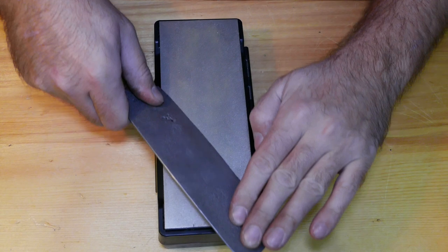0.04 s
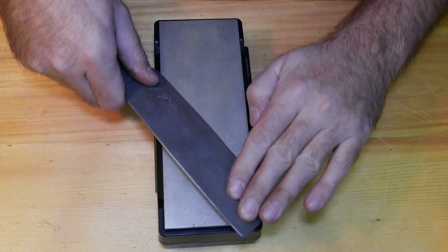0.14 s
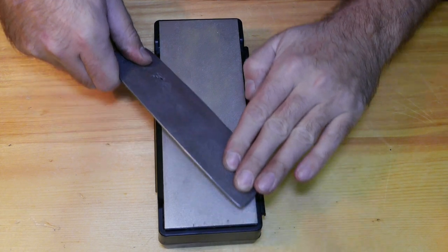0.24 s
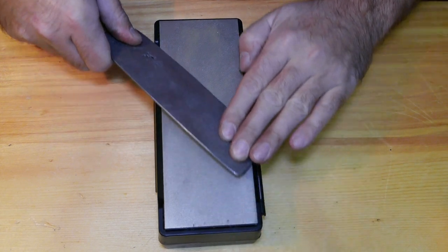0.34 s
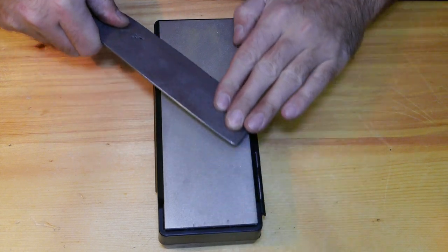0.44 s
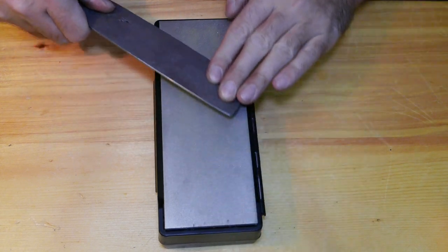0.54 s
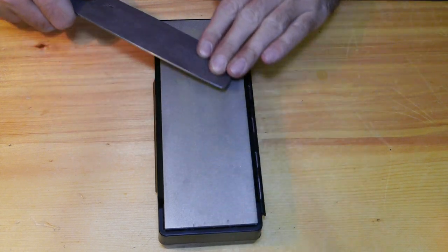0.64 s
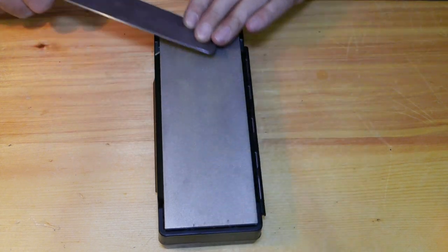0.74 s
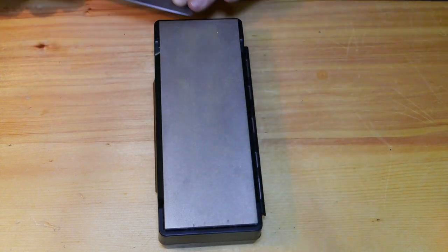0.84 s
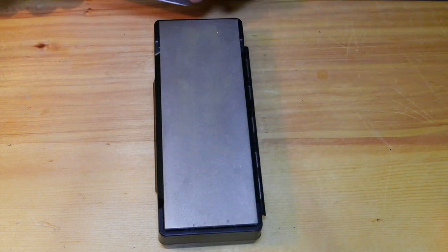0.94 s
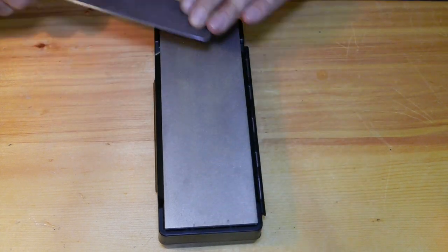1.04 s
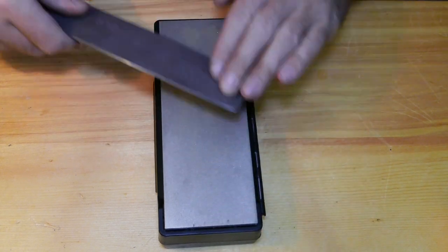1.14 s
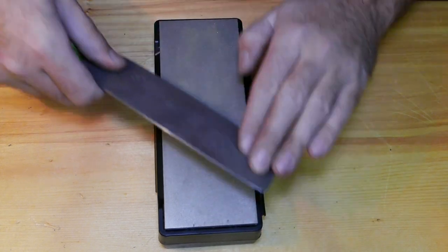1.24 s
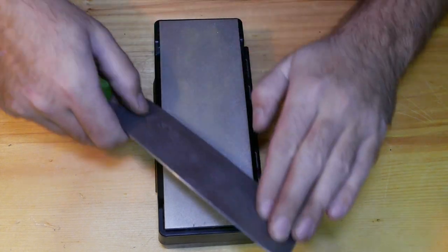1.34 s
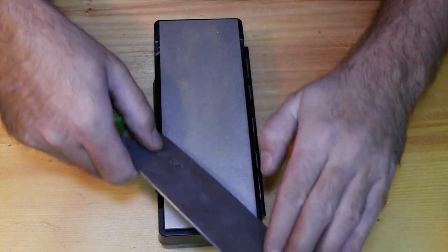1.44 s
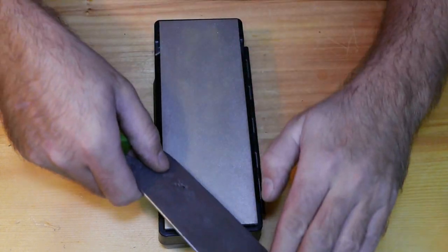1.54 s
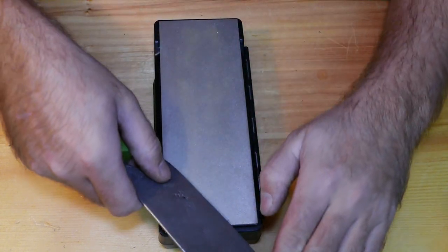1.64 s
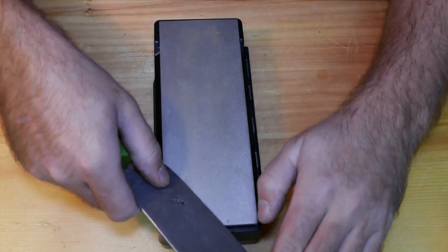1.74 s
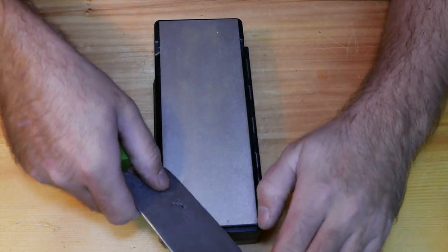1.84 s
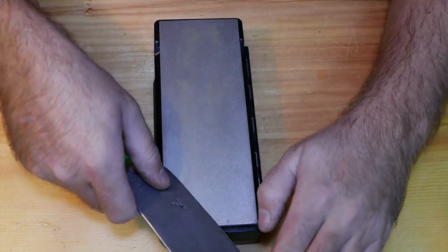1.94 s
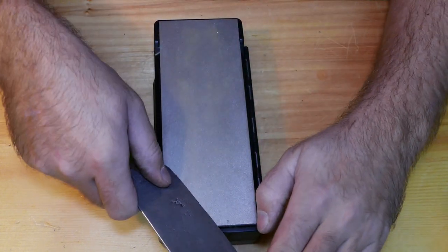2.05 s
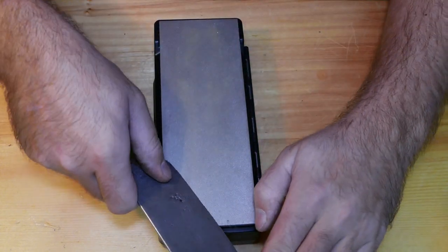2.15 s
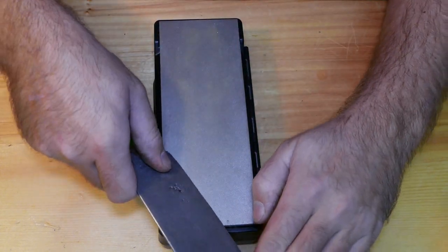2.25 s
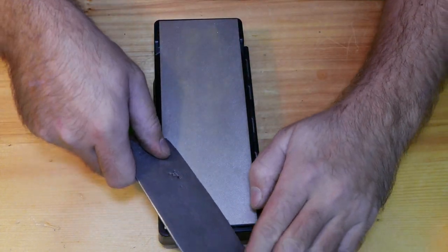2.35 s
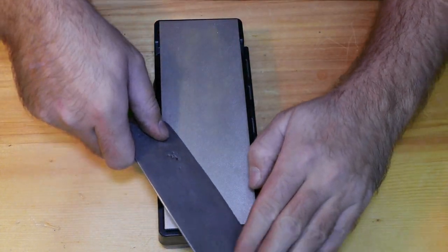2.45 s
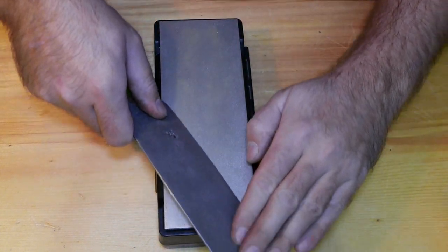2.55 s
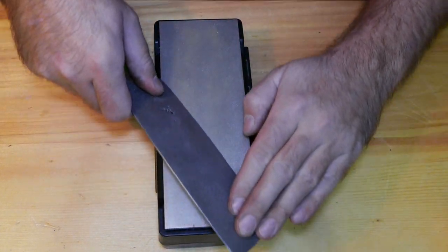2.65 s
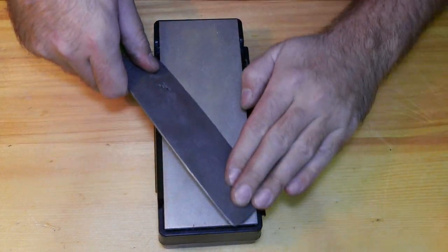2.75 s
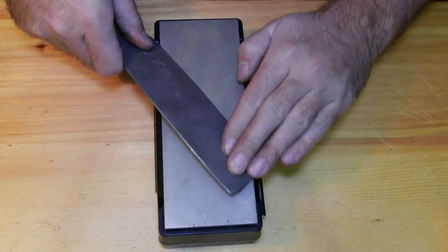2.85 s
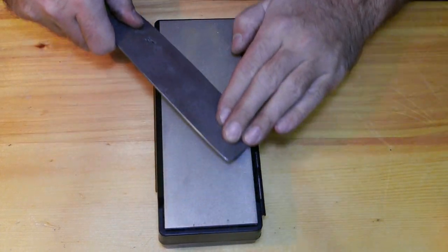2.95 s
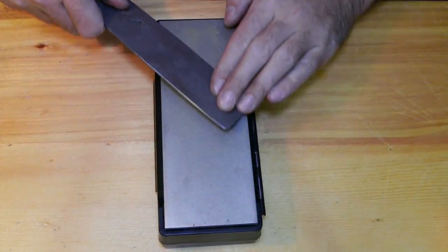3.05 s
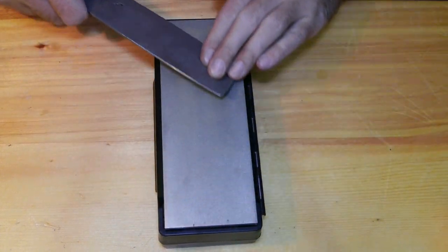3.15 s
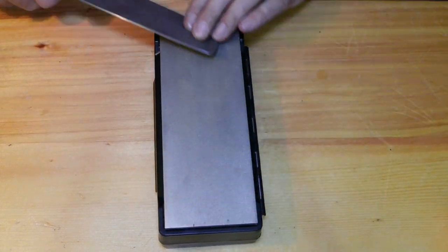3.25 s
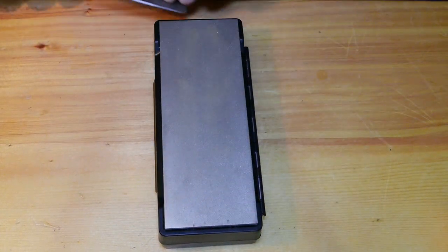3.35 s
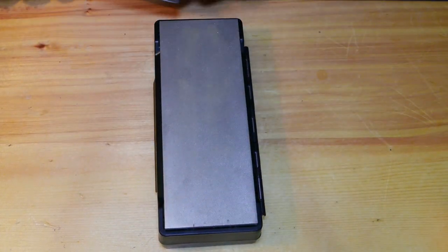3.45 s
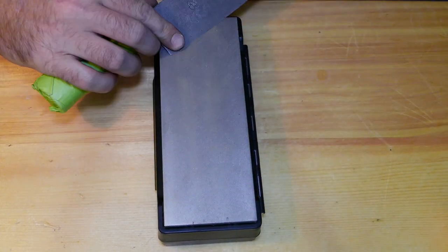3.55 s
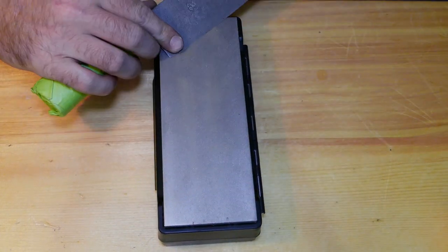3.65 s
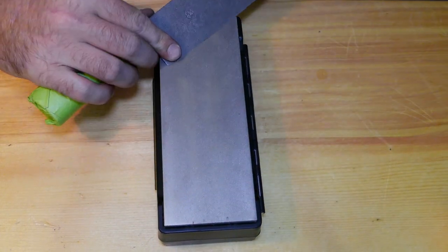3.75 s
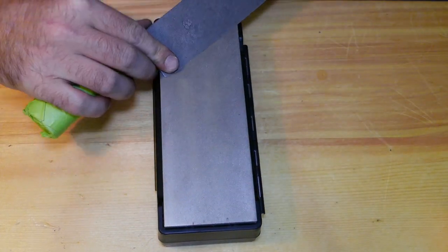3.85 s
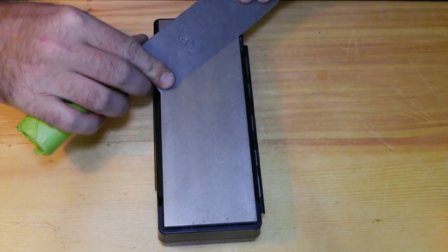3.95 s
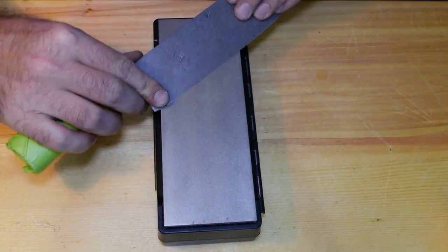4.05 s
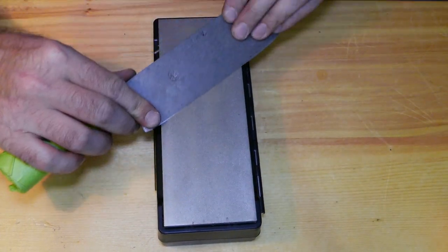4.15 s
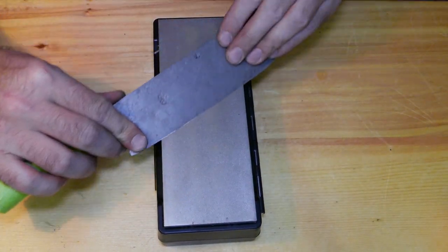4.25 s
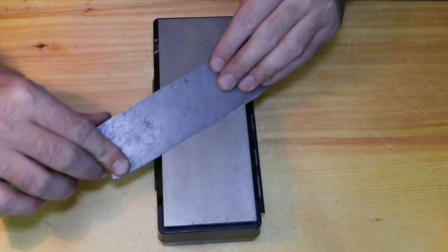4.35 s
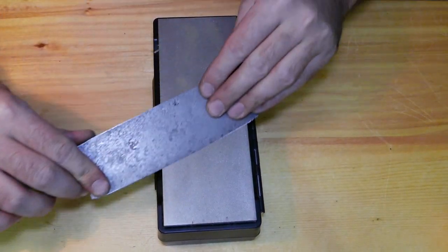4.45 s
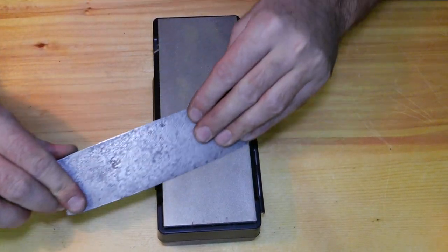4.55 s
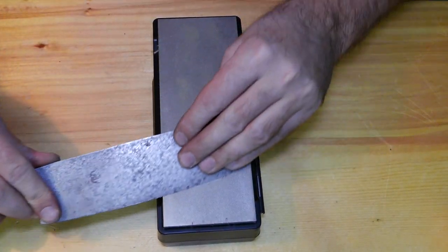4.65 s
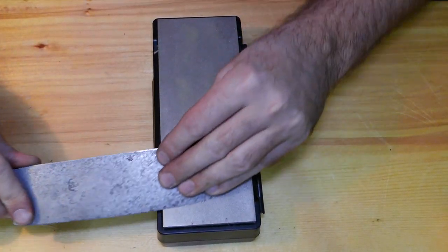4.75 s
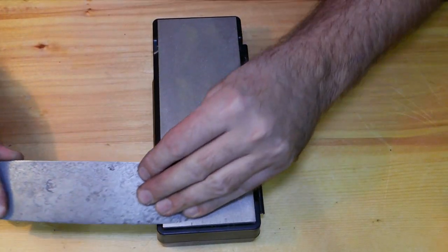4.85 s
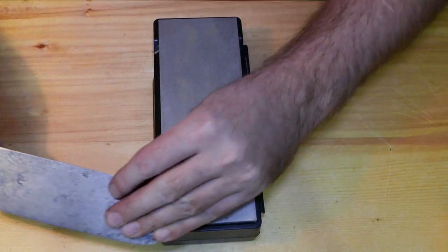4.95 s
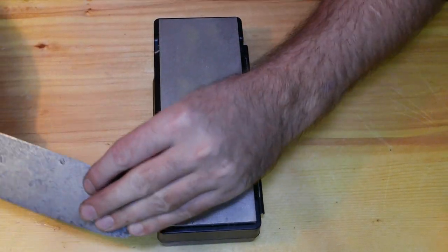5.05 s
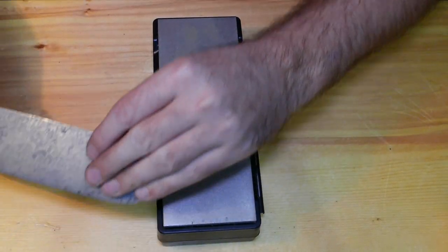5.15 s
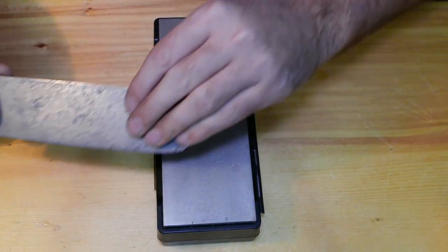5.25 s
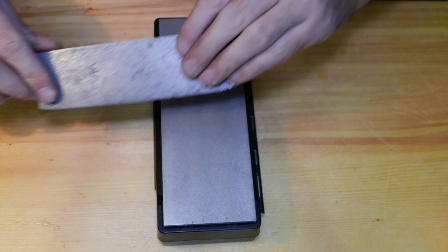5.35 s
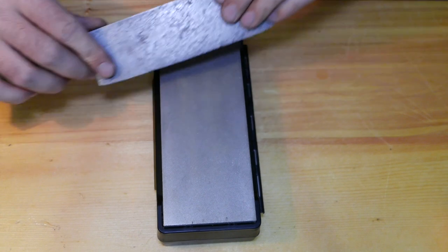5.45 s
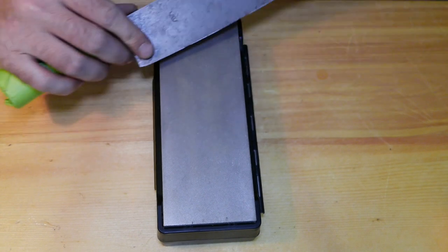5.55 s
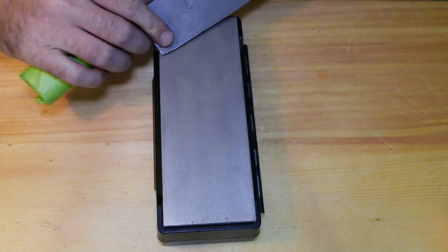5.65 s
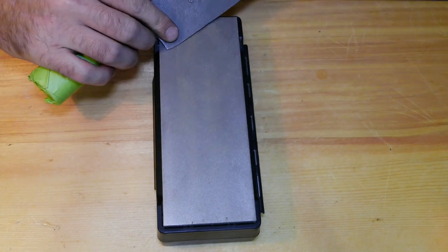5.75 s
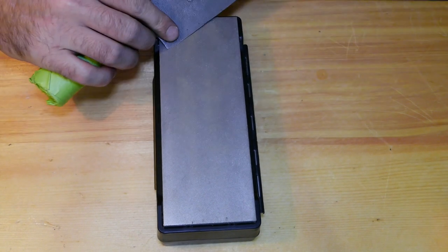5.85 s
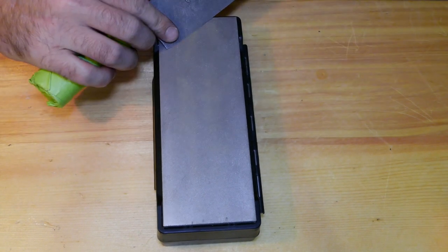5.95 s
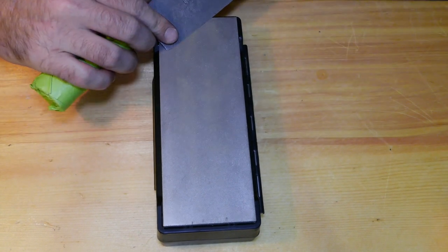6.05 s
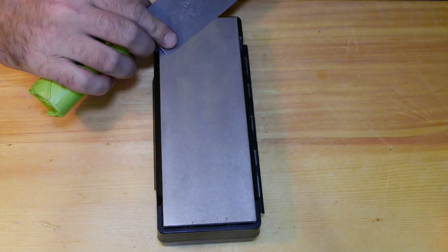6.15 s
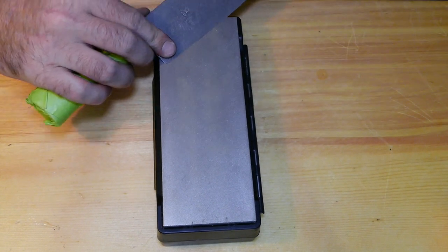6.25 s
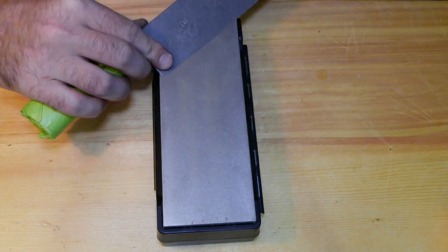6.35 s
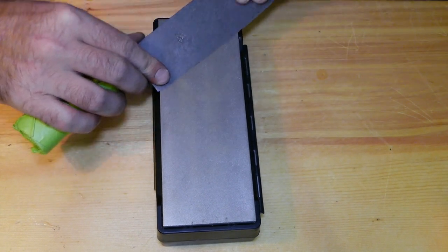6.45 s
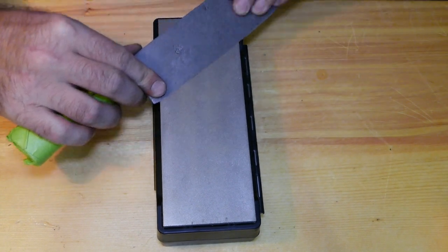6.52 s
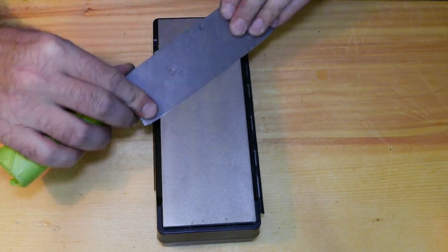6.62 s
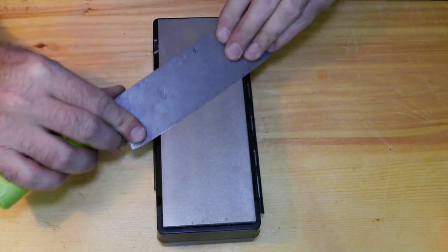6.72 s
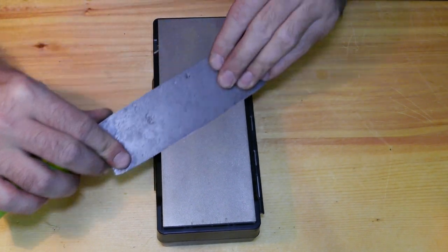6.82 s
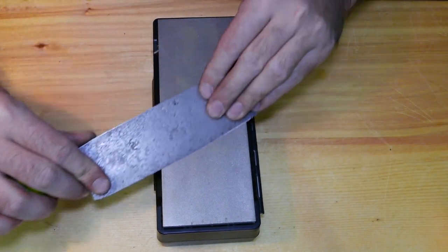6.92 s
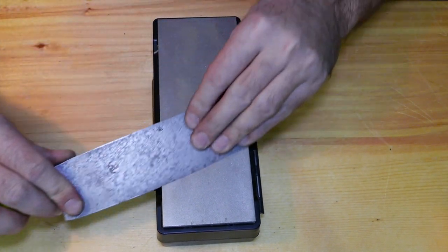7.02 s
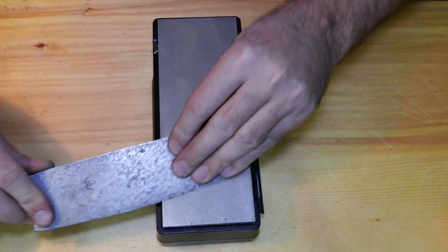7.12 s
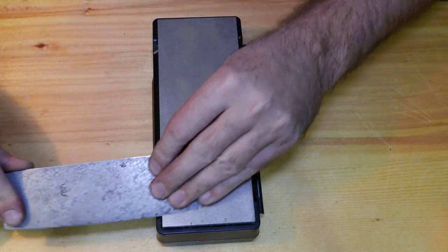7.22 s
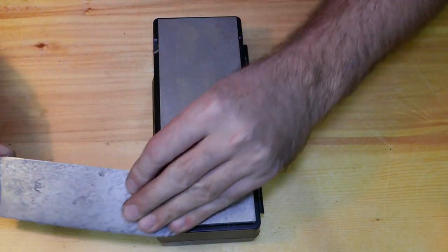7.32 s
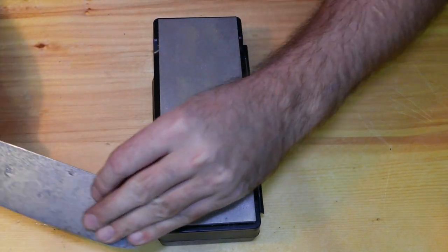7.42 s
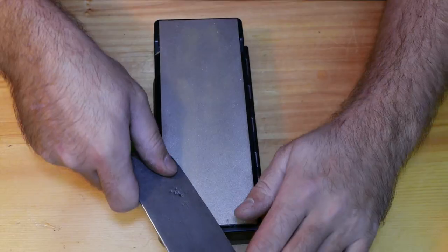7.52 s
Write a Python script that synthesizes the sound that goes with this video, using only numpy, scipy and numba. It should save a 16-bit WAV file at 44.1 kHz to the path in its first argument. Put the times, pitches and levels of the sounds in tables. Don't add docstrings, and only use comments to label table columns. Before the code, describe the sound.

A steel blade rasps over a gritty sharpening plate in four long ringing strokes, with table thuds and a low fan hum in a small room.

```python
import sys
import numpy as np
from scipy import signal
from scipy.fft import rfft, irfft
from scipy.io import wavfile
from scipy.ndimage import uniform_filter1d
from numba import njit

SR = 44100
rng = np.random.default_rng(int(sys.argv[2]) if len(sys.argv) > 2 else 0)


def attenuation_scalar(level_db):
    decades = np.asarray(level_db, float) / 20
    return 10 ** decades


def put_to_file(sound):
    columns = np.atleast_2d(sound).T
    safe = np.clip(columns, -1, 1)
    whole_steps = np.round(safe * 32767)
    wavfile.write(sys.argv[1], SR, whole_steps.astype(np.int16))


N = 334278
T = np.arange(N) / SR

# pitch in Hz, level in dB.
GRIT_COLOUR = [(180, -57), (300, -12.5), (573, -21.5), (633, -10.5), (839, -10.5), (1580, -1.5), (1800, -3),
               (2160, -4), (2640, -3), (2960, -5), (3740, -9), (5660, -9.5), (7140, -7.5), (12800, -7),
               (15800, -16)]
# pitch in Hz, width in Hz, level in dB.
TABLE_MODES = [(79.4, 25, -19.5), (115, 57, -8), (155.2, 30.4, 3), (225.7, 27, -1), (266, 23.6, -1),
               (468.6, 71, -12)]
CUTS = [
    2.0,
    3.552,
    6.0,
    7.531,
    9.0,
]


@njit
def svf(x, hz, width):
    y, band, low = np.empty(len(x)), 0., 0.
    for i in range(len(x)):
        g, k = np.tan(np.pi * hz[i] / SR), width / hz[i]
        v = (band + g * (x[i] - low)) / (1 + g * (g + k))
        band, low, y[i] = 2 * v - band, low + 2 * g * v, k * v
    return y


def unit(x):
    return x / np.sqrt(np.mean(x ** 2))


def walk(rate, count):
    k = int(SR / rate)
    goals = np.repeat(rng.standard_normal(count // k + 1), k)
    return 1.23 * uniform_filter1d(uniform_filter1d(goals, k), k)[:count]


def colour(x, spectrum):
    hz, db = np.transpose(spectrum)
    f = np.arange(len(x) // 2 + 1) * SR / len(x) + 1
    return irfft(rfft(x) * attenuation_scalar(np.interp(np.log(f), np.log(hz), db)), len(x))


def ring(force, modes, shift_db=0., drift=0., rate=9):
    n = len(force)
    out = np.zeros(n)
    for k, (hz, width, db) in enumerate(modes):
        swell = attenuation_scalar(db + shift_db * walk(rate, n))
        tune = hz * (1 + drift * walk(6, n))
        out += (-1) ** k * swell * svf(force, tune, 1. * width)
    return out


def fans():
    # pitch in Hz, level in dB.
    air_colour = [(15, -59.5), (25, -34), (70, -9.5), (150, 2.5), (280, -5.5), (410, 1.5), (520, -3.5),
                  (700, -2), (880, -3.5), (960, -9.5), (1640, -8), (2200, -13.5), (2420, -10), (2680, -14),
                  (2870, -4.5), (3100, -18.5), (3300, -18), (3800, -24), (7500, -28), (10000, -25),
                  (13000, -30.5), (15800, -27)]
    # pitch in Hz, likeness from 0 to 1.
    likeness = [(60, 0.85), (130, 1), (290, 0.94), (640, 0.52), (1410, 0.6), (3100, 0.7), (6820, 0.5),
                (15000, 0.42)]
    # time in
    # seconds, level in dB, treble in dB.
    air_loudness = [(0, 6, -1.5), (1.1, -1.5, 0), (1.85, -0.5, -3.5), (3.55, 0.5, 4), (3.553, -6.5, -5),
                    (3.7, 0.5, -0.5), (5.2, 1.5, 3), (5.9, -1, 0.5), (6.05, 0, -3.5)]
    s, *columns = np.transpose(air_loudness)
    gain_db, treble_db = (np.interp(T, s, c) for c in columns)

    def air():
        hum = attenuation_scalar(1.0) * unit(colour(rng.standard_normal(N), air_colour))
        top = colour(hum, [(3000, -40), (3600, 0)])
        return hum + (attenuation_scalar(treble_db) - 1) * top

    apart = [(hz, 10 * np.log10((1 - c) / (1 + c)) + 1.5) for hz, c in likeness]
    mid = colour(air(), [(12500, 1.36), (15500, -2)])
    side = colour(colour(air(), apart), [(12500, 1), (15500, -4.5)])
    level = attenuation_scalar(-53.0 + .7 * walk(3, N) + gain_db)
    return level * np.array([mid + side, mid - side]) + attenuation_scalar(gain_db - 1.5) * motors()


def motors():
    # pitch in Hz, level in dB.
    motor_tones = [(151, -66), (403.7, -61), (468.3, -66), (689.1, -70), (748.3, -66), (807.5, -70),
                   (866.7, -67), (1868, -78), (2399, -77), (2840, -75)]
    out = np.zeros(N)
    for hz, db in motor_tones:
        tone = np.sin(2 * np.pi * (hz * T + rng.random()))
        out += np.sqrt(2) * attenuation_scalar(db + 2.5 * walk(4, N)) * tone
    return out


def grit(count, share=.5):
    size_db = np.minimum(2.2 * rng.exponential(size=count), 9)
    clicks = rng.standard_normal(count) * attenuation_scalar(size_db) * (rng.random(count) < share)
    return unit(clicks) * attenuation_scalar(.6 * walk(18, count) + 1.1 * walk(50, count))


def stroke(table, passing, face):
    belly_s, flick_s, _, base_db = passing
    _, _, _, extra_rumble_db, extra_fine_db, toward = face
    s, *columns = np.transpose(table)
    t = T[(T >= s[0]) & (T < s[-1])]
    scrape_db, flex_db = (np.interp(t, s, c) for c in columns)
    grit_db = scrape_db - 4.0
    past_belly = np.clip((t - belly_s) / 0.077 + 1.16, 0, 1)
    force = grit(len(t))

    crowd_hz = 3200 + 12000 * (np.arange(40) + rng.random(40)) / 40
    crowd = [(hz, 60 + hz / 60, 0) for hz in crowd_hz]
    shimmer = attenuation_scalar(-9) * unit(ring(force, crowd, shift_db=7, drift=.018, rate=16))
    hiss = unit(colour(force + shimmer, GRIT_COLOUR))

    body = unit(colour(hiss, [(2400, -13.5), (2800, -31.0)]))
    edge = unit(colour(hiss, [(2400, -27.5), (2800, -1.0), (6200, 1.0), (6800, -9.0)]))
    fine = unit(colour(hiss, [(6200, -20.5), (6800, -18.0)]))
    blade = attenuation_scalar(1.43 * flex_db - 3.5) * body + attenuation_scalar(-1.5) * edge
    blade = blade + attenuation_scalar(extra_fine_db * past_belly - 4.0) * fine

    shade_db = -13 * toward * np.clip((t - flick_s) / .1 + 1, 0, 1)
    blade = blade + (attenuation_scalar(shade_db) - 1) * colour(blade, [(10500, -40), (12500, 0)])

    rumble_db = np.minimum(base_db + extra_rumble_db * past_belly - grit_db, 18.5)
    rumble = attenuation_scalar(rumble_db - 0.5) * unit(ring(grit(len(t)), TABLE_MODES, shift_db=-2.0))
    song = attenuation_scalar(-1.3) * singing(force, t, flex_db + 2.0, passing, face)

    fade_in = np.clip((t - s[0]) / 0.0055 + (s[0] == 0), 0, 1)
    fade_out = np.clip((s[-1] - t) / 0.027 + (s[-1] > 7.5), 0, 1)
    out = np.zeros(N)
    start = int(np.ceil(s[0] * SR))
    out[start:start + len(t)] = attenuation_scalar(grit_db) * fade_in * fade_out * (blade + song + rumble)
    return out


def singing(force, t, flex_db, passing, face):
    _, flick_s, pitch, _ = passing
    sliding, tip, flick_length, _, _, toward = face
    bending_hz = 2600
    modes = []
    for start, length, hz0, hz1, db in sliding:
        width = 80 + .017 * hz0
        if toward and 1400 < hz0 < bending_hz:
            width *= 1.6
        modes.append((start, start + length, hz0, hz1, width, db))
    for hz, width, db in tip:
        start, end = flick_s - flick_length / 2, flick_s + flick_length / 2
        modes.append((start, end, pitch * hz, pitch * hz, width, db))

    out = np.zeros(len(t))
    for start, end, hz0, hz1, width, db in modes:
        on = (t > start) & (t < end)
        if on.sum() > 2:
            along = (t[on] - start) / (end - start)
            hz = (hz0 + (hz1 - hz0) * along) * (1 + .008 * walk(14, len(along)))
            patchy_db = 1.5 * (min(end - start, .5) * 2 + hz0 / 4000) * walk(20.0, len(along))
            bend_db = 0.8 * flex_db[on] * (hz0 < bending_hz)
            tone = unit(svf(svf(force[on], hz, 1.28 * width), hz, 3.0 * width))
            out[on] += attenuation_scalar(db + patchy_db + bend_db) * np.sin(np.pi * along) ** 0.8 * tone
    return out


def room(x, share=1.0):
    # pitch in Hz, time to fade by 60 dB in seconds, level in dB, share differing by port 0-1.
    echoes = [(60, .3, -10, .7), (203, 0.3, -5, 0.01), (610, 0.15, 2.5, 0.43), (2013, 0.29, -5, 0.49),
              (5130, 0.32, -2.5, 0.42), (9950, 0.11, -4, 0.48), (13720, 0.11, -5.5, 1)]
    age = np.arange(SR // 2) / SR
    sides = np.array([[1], [-1]])
    tail = np.zeros((2, len(age)))
    for hz, t60, db, apart in echoes:
        same, other = (svf(rng.standard_normal(len(age)), hz + 0 * age, 1. * hz) for _ in range(2))
        decay = attenuation_scalar(db) * np.exp(-np.log(1000) * age / t60) * np.sqrt(2 * np.log(1000) / (t60 * SR))
        tail += decay * ((1 - apart) * same + apart * other * sides)
    tail *= np.clip(age / .004, 0, 1)
    wet = x * share
    return attenuation_scalar(.05 * sides) * wet * share + signal.oaconvolve(wet[None], tail, axes=1)[:, :N]


def touches():
    # time in seconds, thud level in dB, tick level above the thud in dB, thud pitch in Hz.
    contacts = [(0.55, -41, 16, 180), (0.85, -19, 1, 156), (1.084, -46, -7, 121), (1.138, -50, -3, 170),
                (1.848, -42, -36, 151), (1.898, -19.5, -16.5, 258), (1.94, -30, -34, 266),
                (2.123, -46, 3, 151), (2.159, -38.5, 8, 145), (3.226, -38.5, 7, 273),
                (3.355, -18.5, 2, 190), (3.532, -48, -3.5, 161), (3.689, -44, 3, 215),
                (3.738, -33, -6, 200), (3.827, -33.5, 2, 203), (5.768, -35.5, -18, 158),
                (5.876, -25, -34, 194), (5.901, -53, -30, 196), (6.155, -45, -1, 180), (6.205, -45, 9, 170),
                (6.823, -38, 14, 170), (2.102, -50, 0, 150), (.625, -39, 18, 170), (7.464, -40, 5, 200)]
    # pitch in Hz, width in Hz, level in dB.
    resting = [(680, 120, -4), (980, 140, -2), (1240, 67, 7), (1650, 140, -3), (4230, 120, 0),
               (5120, 150, 1), (5930, 300, -6), (8400, 80, -3), (9580, 160, 1), (10300, 500, -2),
               (12800, 190, -7)]
    count = 6000
    thud, scratch = np.zeros(N + count), np.zeros(N + count)
    age = np.arange(count) / SR
    push = age / .0015 * np.exp(-age / .0011)
    for s, thud_db, tick_db, hz in contacts:
        i = int(s * SR)
        knock = ring(push, TABLE_MODES) + attenuation_scalar(12.0) * svf(push, hz + 0 * age, 24.)
        thud[i:i + count] += attenuation_scalar(thud_db) * knock
        i -= int(.003 * SR)
        scrape = rng.standard_normal(count) * np.exp(-age / 0.005)
        scratch[i:i + count] += attenuation_scalar(thud_db + tick_db) * scrape
    blade = colour(scratch, GRIT_COLOUR) + attenuation_scalar(7.0) * ring(scratch, resting)
    return (attenuation_scalar(11.5) * thud + blade)[:N]


def pings():
    # time in seconds, pitch in Hz, peak in dB, time to fade by 60 dB in seconds.
    freed = [(.847, 3682, -16, .13), (.84, 1189, -27.5, .2), (.846, 8930, -30.5, 0.19),
             (.85, 10970, -40, .18), (.85, 5303, -39, .15), (3.355, 3682, -17, 0.15),
             (3.36, 4480, -36, 0.33), (3.36, 8300, -31, 0.26), (3.36, 10690, -43, .25),
             (3.36, 9545, -41, .3), (5.04, 1987, -36, .35), (5.04, 8450, -41, .3), (5.03, 11050, -41, .19),
             (7.45, 6580, -34.5, 0.21), (7.452, 9500, -36, .2), (7.46, 1960, -40, .3),
             (7.466, 1225, -30, .25)]
    out = np.zeros(N)
    for s, hz, db, t60 in freed:
        age = T[T >= s][:SR // 4] - s
        beat = attenuation_scalar(4 * walk(30, len(age)))
        before_cut = s + age < min(c for c in CUTS if c > s)
        fade = np.clip(age / .003, 0, 1) * np.exp(-np.log(1000) * age / t60) * before_cut
        i = int(np.ceil(s * SR))
        out[i:i + len(age)] += attenuation_scalar(db) * beat * fade * np.sin(2 * np.pi * hz * age)
    return out


def bird():
    # start in seconds, length in seconds, start, top and end pitch in Hz, level in dB.
    chirps = [
        (1.75, .13, 7600, 8100, 7600, -79),
        (1.76, .13, 7000, 7250, 6850, -80),
        (1.93, .13, 6700, 6800, 8100, -83),
    ]
    out = np.zeros(N)
    for s, length, start_hz, top_hz, end_hz, db in chirps:
        along = np.clip((T - s) / length, 0, 1)
        hz = np.interp(along, [0, .35, 1], [start_hz, top_hz, end_hz])
        hz = uniform_filter1d(hz, size=800)
        swell = np.sqrt(np.sin(np.pi * along).clip(0)) * (along < 1)
        out += np.sqrt(2) * attenuation_scalar(db) * swell * np.sin(2 * np.pi * np.cumsum(hz) / SR)
    return out


def scene():
    # time in seconds, scrape level in dB from speed and pressure,
    # flex in dB (how freely the blade bends under the fingers).
    strokes = [
        [(0, -33.5, 5.5), (.11, -26.5, 1), (.54, -21.5, -4.5), (.63, -23, -8.5), (.67, -26.5, -6.5),
         (.75, -27.5, -10), (.83, -22.5, -8), (.858, -26, -21), (.885, -61, -26.5)],
        [(2.06, -73.5, 12), (2.164, -46.5, 0), (2.45, -35.5, 1.5), (2.714, -27, 2), (3.228, -18.5, -8),
         (3.245, -29, -8.5), (3.288, -26, -10), (3.358, -18.5, -12), (3.385, -35, -29)],
        [(3.685, -58.5, 4), (3.806, -38, 3), (4.014, -29, 2.5), (4.3, -24, -3.5), (4.544, -22.5, -8.5),
         (4.8, -25.5, -4), (4.938, -28, -2.5), (5.024, -19, -6.5), (5.08, -38.5, 9)],
        [(6.09, -77, -2), (6.162, -50, 4.5), (6.334, -34.5, 4), (6.9, -20, -7.5), (7.154, -22, -8.5),
         (7.364, -30, -3.5), (7.426, -20.5, -5.5), (7.456, -26, 7), (7.485, -38, -4)],
    ]
    # time in seconds, scrape level in dB, flex in dB.
    restart = [
        (7.53, -47, 7),
        (7.56, -42, -11.5),
        (7.58, -34.5, -11),
    ]
    # seconds when the contact reaches the belly, seconds when the tip flicks off,
    # pitch factor, base rumble in dB.
    passes = [
        (.66, .83, 1.0, -39),
        (3.245, 3.36, 1.0, -39),
        (4.8, 5.03, .99, -38),
        (7.22, 7.435, 1.015, -38),
        (7.56, 7.9, 1.0, -50),
    ]
    # start in seconds, length in seconds, from Hz, to Hz, level over the grit in dB.
    away = [(-.12, .25, 1500, 1600, -0.5), (0.153, .24, 1530, 1620, -1), (.36, .2, 1600, 1480, -8.5),
            (-0.018, .2, 760, 990, -6), (0.194, 0.5, 1095, 1200, -6.5), (.74, 0.22, 1203, 1230, 3.5),
            (0.083, .17, 2930, 2950, -5), (0.247, .22, 2960, 3010, -3), (0.495, 0.098, 2980, 2960, 1),
            (0.588, .09, 2800, 2680, -0.5), (.4, 0.29, 3480, 3450, -9.5), (0.697, .11, 3350, 3250, -5),
            (.66, .18, 4050, 3900, -10), (.0, 0.48, 4550, 4630, -6), (0.497, 0.15, 4950, 4900, -10),
            (-0.091, .42, 5780, 5620, -4.5), (0.29, .17, 5900, 5730, -3), (.45, .22, 5720, 5480, -3.5),
            (0.37, .2, 6500, 6500, -9), (.59, 0.11, 6550, 6650, -7), (.69, .1, 6200, 5950, -7),
            (.08, .16, 8900, 8890, -8), (-.05, 0.24, 10000, 9800, -8), (0.395, 0.13, 10500, 10500, -7.5),
            (0.553, .12, 10750, 10700, -4.5), (.5, .09, 12500, 12500, -8.5), (0.61, .08, 9800, 9700, -8),
            (.73, .12, 12200, 10600, -11), (.74, .08, 13400, 13200, -8)]
    away_again = [(2.054, 0.46, 1230, 1256, 2), (2.42, .22, 1330, 1480, -1), (2.6, .3, 1540, 1600, -4.5),
                  (2.88, .2, 1610, 1470, -6.5), (2.86, 0.16, 990, 1100, -7.5), (3.2, .22, 1250, 1200, -4.5),
                  (2.1, 0.44, 1970, 2100, -7), (2.5, 0.52, 2330, 2300, -10), (3.17, .13, 2000, 2000, -5.5),
                  (2.06, .42, 2840, 2870, -8), (2.66, .45, 2950, 3050, -5.5), (3.1, 0.17, 2990, 2780, -2.5),
                  (3.09, .11, 3450, 3470, -4.5), (3.25, 0.073, 3200, 3250, -4.5),
                  (3.08, .2, 4150, 4050, -5.5), (2.6, 0.27, 4570, 4680, -3.5), (2.2, .6, 5750, 5600, -8),
                  (2.78, .32, 5800, 5500, -5), (2.85, 0.19, 6000, 6350, -7.5), (3.1, .15, 5350, 5350, -6.5),
                  (3.17, 0.092, 6700, 6600, -6.5), (3.28, .11, 6320, 6350, -6),
                  (2.62, 0.13, 8600, 8700, -10), (2.7, .16, 10000, 10000, -8), (2.62, .1, 9100, 9300, -8),
                  (2.8, .14, 10460, 10600, -7), (2.92, 0.19, 10000, 10200, -7.5),
                  (3.24, .14, 10800, 9200, -5.5), (2.65, .15, 2050, 2050, -10)]
    toward = [(3.72, .3, 1900, 2010, -7.5), (3.95, .25, 1520, 1600, -10), (4.16, 0.21, 2160, 2060, 2.5),
              (4.4, .17, 2220, 2150, 4), (4.5, .24, 2150, 2100, 3), (4.44, 0.11, 1850, 1850, -2.5),
              (4.08, 0.27, 2500, 2520, -2), (4.05, 0.81, 1180, 1200, -13), (4.68, .13, 1950, 1900, -5.5),
              (4.74, .2, 1190, 1205, -7), (4.86, .24, 1204, 1205, 2), (4.15, .55, 2350, 2400, -6),
              (3.7, 0.35, 3100, 2780, -7), (4.24, 0.23, 2980, 2940, -5.5), (4.52, .14, 2920, 2850, -6),
              (4.6, 0.23, 2730, 2740, -3), (3.86, 0.22, 3930, 3950, -6), (4.08, .15, 2800, 2850, -5),
              (3.8, 0.37, 5530, 5700, -5.5), (4.47, .17, 5280, 5220, .5), (4.61, .14, 5700, 5650, -5),
              (4.05, 0.27, 3300, 3250, -9), (3.95, 0.16, 9800, 10000, -7), (4.4, .14, 9500, 9300, -9.5),
              (4.55, .2, 10000, 9700, -8), (4.72, .12, 10000, 11200, -6), (4.83, .2, 13000, 10400, -13),
              (4.36, 0.093, 11000, 11000, -11.5)]
    toward_again = [(6.17, .3, 1940, 2030, -7), (6.45, 0.28, 1980, 2100, -7.5),
                    (6.7, 0.26, 2060, 2040, 3.5), (6.8, 0.22, 2260, 2160, 2), (6.97, 0.2, 2160, 2200, 2),
                    (7.16, 0.094, 2000, 2000, -1), (6.34, 0.31, 1570, 1640, -9.5),
                    (6.85, .15, 1170, 1130, -10.5), (7.15, 0.23, 1190, 1140, -3),
                    (7.37, .12, 1200, 1250, 4), (7.42, .06, 1240, 1230, 2), (7.4, .07, 3250, 3400, -1),
                    (6.7, .45, 2150, 2350, -5), (6.14, 0.25, 3350, 3000, -4), (6.35, 0.21, 2850, 2850, -5),
                    (6.63, 0.19, 2900, 2920, -3.5), (6.8, 0.16, 2910, 2900, -3.5),
                    (6.97, .2, 3000, 2770, -4.5), (6.62, .22, 3230, 3200, -8), (6.18, 0.34, 4000, 3850, -8),
                    (6.5, 0.35, 2800, 2520, -4), (6.8, 0.15, 5050, 5200, -6.5),
                    (6.91, .17, 5550, 5650, -0.5), (6.92, .07, 6250, 6250, -5.5),
                    (7.08, .12, 5950, 6100, -7), (6.82, .12, 4600, 4600, -10), (7.17, .12, 5000, 4700, -10),
                    (6.44, .12, 9900, 9700, -8), (6.75, .16, 9900, 9400, -8.5),
                    (7.02, .14, 9800, 10000, -8.5), (7.24, .16, 13000, 11000, -13)]
    settling = [
        (7.5, .12, 500, 455, 11.5),
        (7.5, 0.11, 855, 855, 3),
        (7.534, .086, 1810, 1700, -2),
    ]
    # pitch in Hz, width in Hz, level over the grit in dB.
    tip_away = [(3800, 900, -2.5), (1810, 270, -2), (9400, 1100, -4)]
    tip_toward = [(3300, 200, 1.5), (3800, 220, 0), (787, 56, -13), (6400, 130, -13.5), (11050, 150, -17)]
    # sliding tones, tip tones, flick length in seconds, extra rumble past the belly in dB,
    # extra fine hiss past the belly in dB, whether pulled toward the body.
    faces = [
        (away, tip_away, 0.095, 0.91, 0.11, False),
        (away_again, tip_away, 0.056, .1, 0.99, False),
        (toward, tip_toward, 0.11, 4, -2.5, True),
        (toward_again, tip_toward, 0.15, 1.7, 0, True),
        (settling, [], .11, 0.11, 0.11, False),
    ]
    knocks = signal.sosfilt(signal.butter(2, 110., "high", fs=SR, output="sos"), touches())
    early = T < CUTS[1]
    out = room(knocks * early) * early + room(knocks * ~early)
    out = out + pings() * attenuation_scalar(np.array([[1.], [-1.]]))
    turn = np.pi / 2 * T / .3
    for table, passing, face, cut_s in zip(strokes + [restart], passes, faces, CUTS):
        scrape = stroke(table, passing, face)
        heard = room(scrape, np.cos(turn)) + room(scrape, np.sin(turn))
        out = out + heard * (T < cut_s)
    return fans() + bird() + signal.sosfilt(signal.butter(2, 75., "high", fs=SR, output="sos"), out)


def roll_off(x):
    return signal.sosfilt(signal.butter(12, 15900, fs=SR, output="sos"), x)


def record(dry):
    # pitch in Hz, width in Hz, depth from 0 to 1.
    dips = [(543, 62, 0.57), (2683, 83, 0.6), (7430, 1570, 0.27)]
    # pitch in Hz, left over right in dB.
    ports = [(200, 0), (500, -.7), (1290, 1.2), (2380, 1), (4400, .9), (8120, 0), (13500, -.2)]
    # pitch in Hz, level in dB.
    fading_top = [(15750, -3.5), (15900, -46.5)]
    for hz, width, depth in dips:
        dry = dry - depth * np.array([svf(c, hz + 0 * T, 1. * width) for c in dry])
    heard = []
    for channel, side in zip(dry, (1, -1)):
        tone = [(hz, side * db / 2) for hz, db in ports]
        heard.append(colour(channel, tone + fading_top))
    mix = np.tanh(1.32 * np.array(heard)) / 1.304
    return roll_off(mix)


dry = scene()
out = record(dry)
put_to_file(out)
```